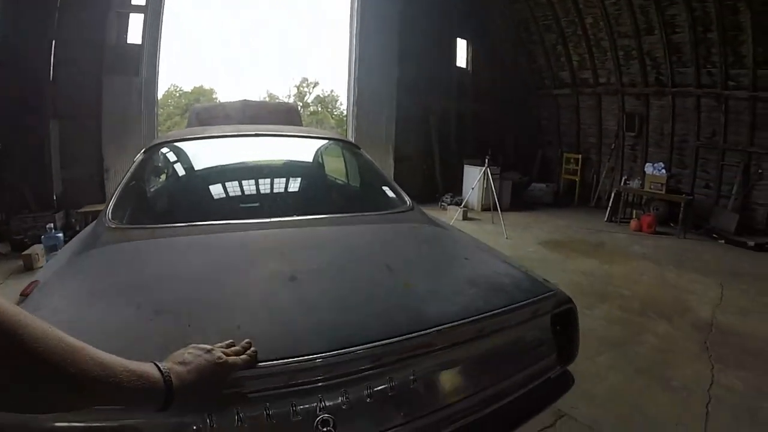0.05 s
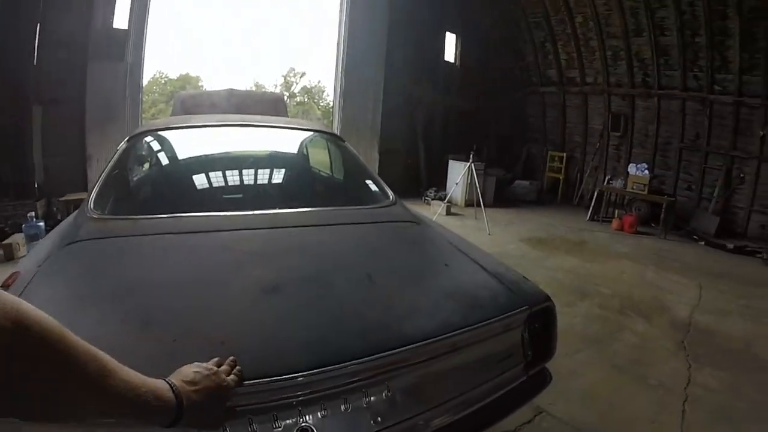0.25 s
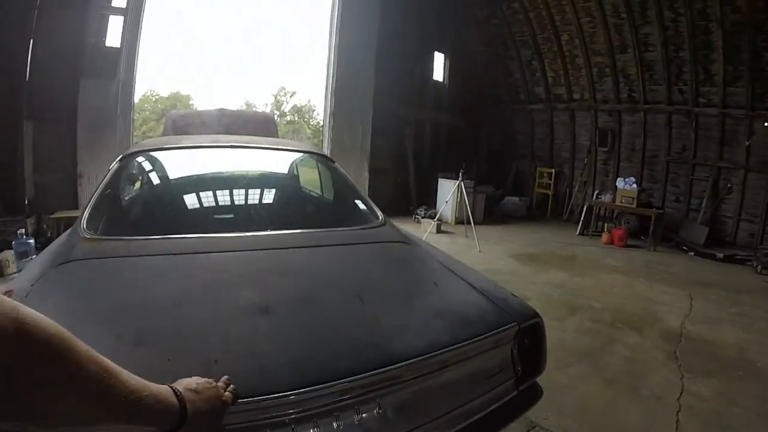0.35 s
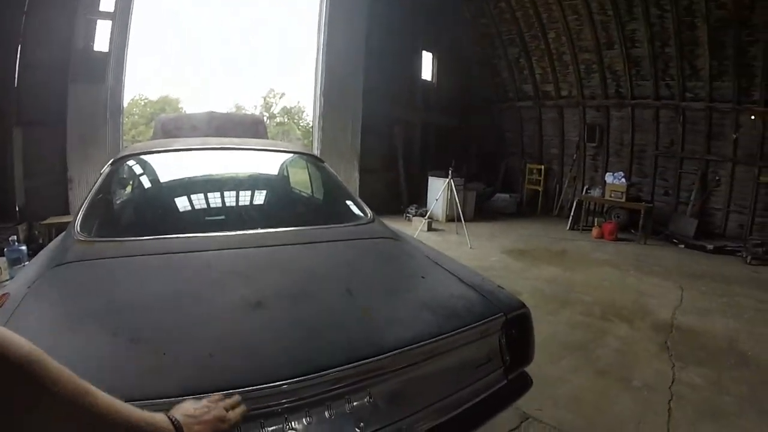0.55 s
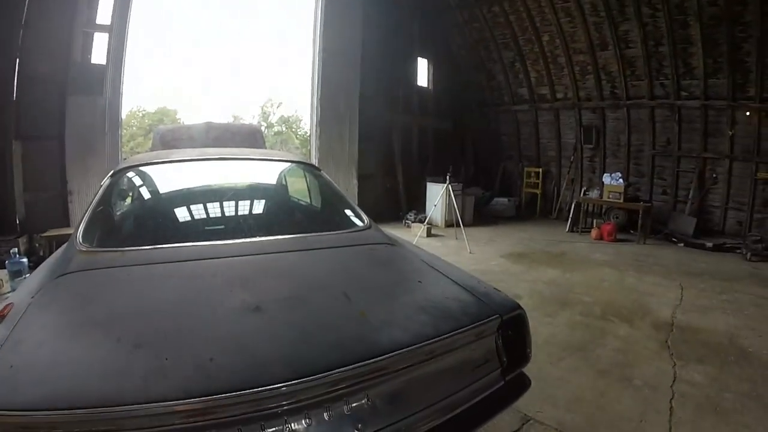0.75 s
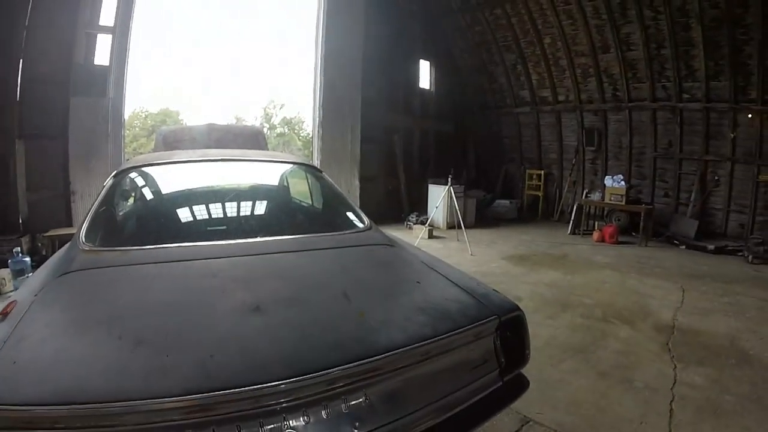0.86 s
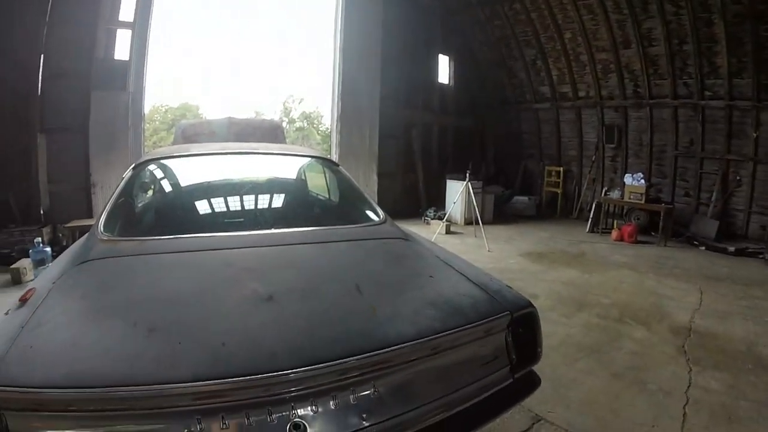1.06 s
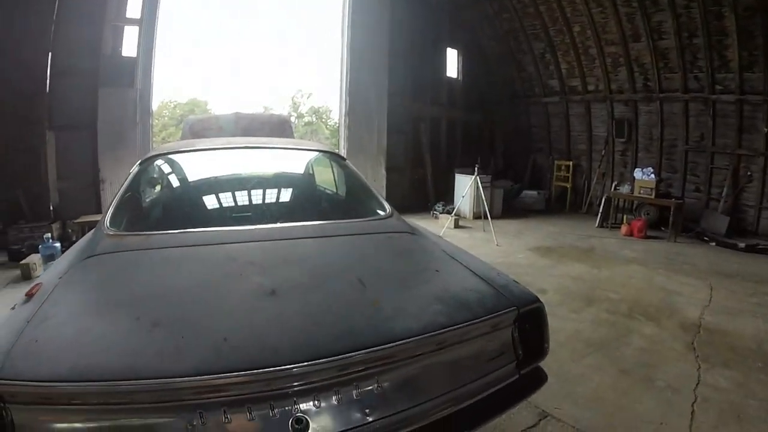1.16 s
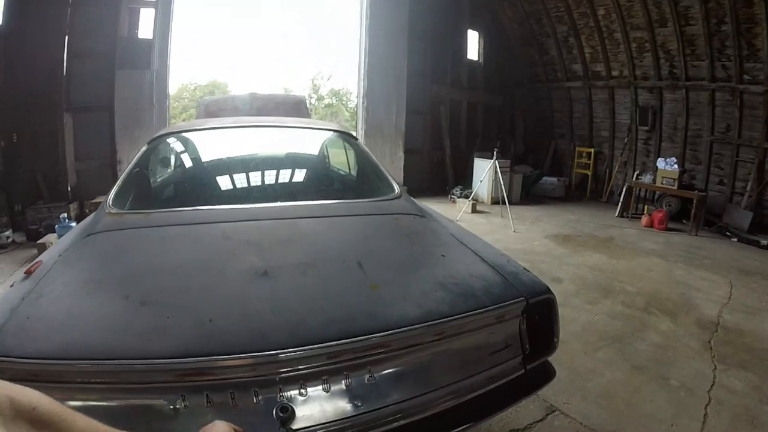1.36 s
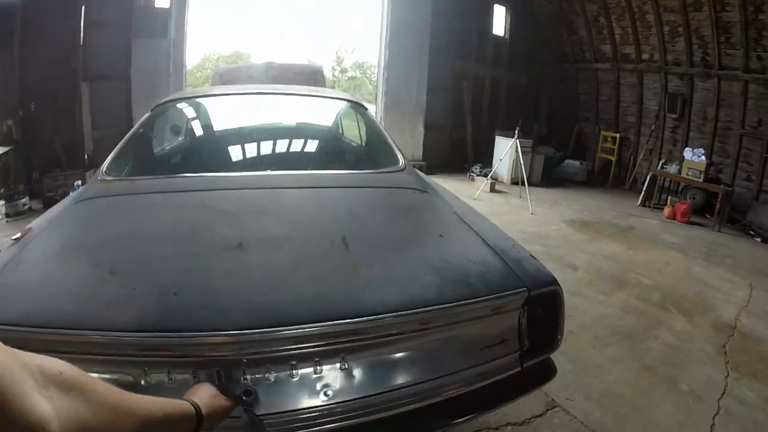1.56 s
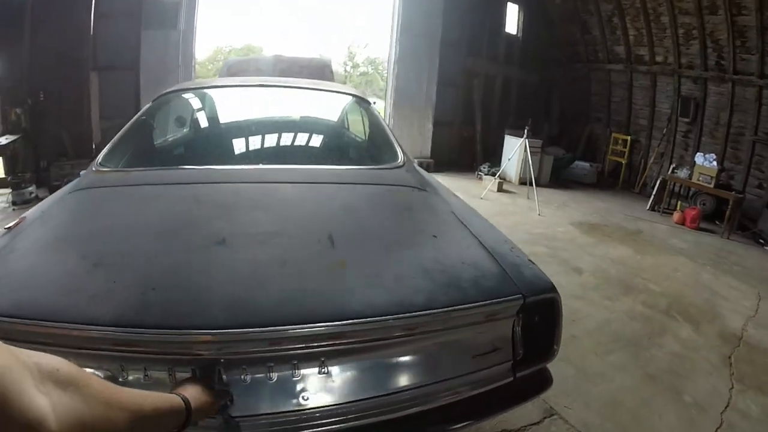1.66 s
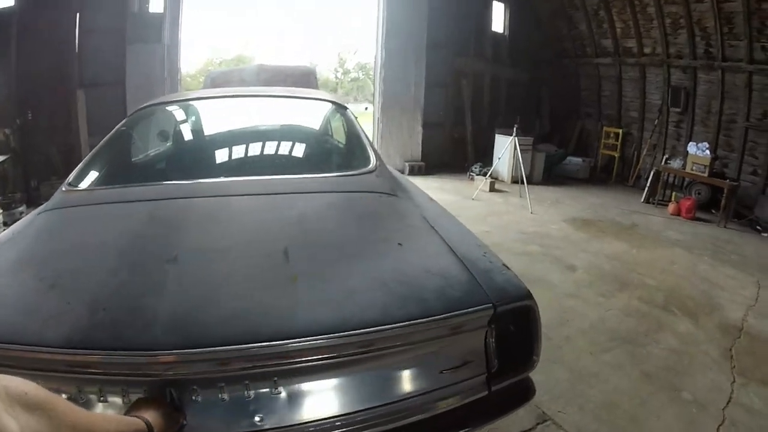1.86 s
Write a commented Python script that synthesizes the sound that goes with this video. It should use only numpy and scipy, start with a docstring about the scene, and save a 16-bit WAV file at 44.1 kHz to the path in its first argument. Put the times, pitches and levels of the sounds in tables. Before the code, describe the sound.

A car trunk lid groans briefly, then slams shut with a ringing thud in a barn.

```python
"""Out of the quiet of a large barn, dry steel hinges rub and groan as an old car's trunk lid is pushed down.
The lid crashes onto latch and frame with a thump of trapped air, rebounds, and lid, body and barn ring.
Light knocks and a squeaking scuff follow, then a hand slides to the lock, works it and ends on a clunk.
Contacts are decaying noise bands, rubbing is gritty noise, the groan is a wavering tone with overtones,
the steel is damped sines, and the barn is a convolved noise tail."""
import sys
import numpy as np
from scipy import signal
from scipy.fft import rfft, irfft
from scipy.io import wavfile

SR = 44100
rng = np.random.default_rng(int(sys.argv[2]) if len(sys.argv) > 2 else 0)


def transcribe(signal):
    """Save signal, clipped to [-1, 1], as a 16-bit WAV file at the path in sys.argv[1]."""
    frames = np.atleast_2d(signal).T
    limited = np.clip(frames, -1, 1)
    pcm = np.round(limited * 32767).astype(np.int16)
    wavfile.write(sys.argv[1], SR, pcm)


N = 83790
T = np.arange(N) / SR
EDGES = np.geomspace(20, 17000, 25)   # band edges, Hz
CENTRES = np.sqrt(EDGES[1:] * EDGES[:-1])


def from_db(db):
    """Decibels to gain."""
    return 10 ** (np.asarray(db) / 20)


def rms_one(x):
    """Scale to rms 1."""
    return x / np.sqrt(np.mean(x ** 2) + 1e-20)


def at_hz(points, hz):
    """Read a table on a log-frequency axis."""
    f, value = np.transpose(points)
    return np.interp(np.log(hz), np.log(f), value)


def level_curve(rows):
    """Gain over time from rows that start with seconds and end with dB; silent outside."""
    rows = np.array(rows)
    level_db = np.interp(T, rows[:, 0], rows[:, -1], left=-200, right=-200)
    return from_db(level_db)


def shaped_noise(gain_at):
    """White noise coloured by a gain function of frequency; rms 1."""
    hz = np.maximum(np.arange(N // 2 + 1) * SR / N, 1)
    white = rfft(rng.standard_normal(N))
    return rms_one(irfft(white * gain_at(hz), N))


def coloured(spectrum):
    """Noise with a tabled spectrum, cut below the lowest band edge."""
    return shaped_noise(lambda hz: from_db(at_hz(spectrum, hz)) * (hz > EDGES[0]))


def narrow_noise(centre_hz, width_hz):
    """Noise in one resonance."""
    return shaped_noise(lambda hz: 1 / (1 + ((hz - centre_hz) / width_hz * 2) ** 2))


def drift(rate_hz):
    """Random wandering of spread 1, mostly slower than the given rate."""
    return shaped_noise(lambda hz: 1 / (1 + (hz / rate_hz) ** 2))


def noise_bands():
    """White noise of rms 1 split into bands that cross-fade into each other."""
    hz = np.arange(N // 2 + 1) * SR / N
    white = rfft(rng.standard_normal(N)) * (hz > EDGES[0])
    place = np.interp(hz, CENTRES, np.arange(len(CENTRES)))
    bands = []
    for k in range(len(CENTRES)):
        share = np.maximum(1 - np.abs(place - k), 0)
        bands.append(irfft(white * share, N))
    return np.array(bands)


def ring(modes, start):
    """Damped sines set off at one moment."""
    age = np.maximum(T - start, 0)
    out = np.zeros(N)
    for hz, db, t60 in modes:
        out += from_db(db - 60 * age / t60) * np.sin(2 * np.pi * hz * age)
    return out


def resonate(x, peaks):
    """Add resonances (f/Hz, width/Hz, gain/dB) to a sound, keeping its overall level."""
    out = x
    for hz, width_hz, db in peaks:
        r = np.exp(-np.pi * width_hz / SR)
        poles = [1, -2 * r * np.cos(2 * np.pi * hz / SR), r * r]
        peak = (1 - r * r) / 2 * signal.lfilter([1, 0, -1], poles, x + 1e-18)
        out = out + from_db(db) * peak
    return rms_one(out) * np.std(x)


RATTLE_DB, RATTLE_HZ = 1.5, 390   # spread and rate of the unevenness in every blow
LOWS_LINGER = 0.21   # ring time falls with frequency by this power


def blows(rows, spectrum):
    """Each blow wakes a dense, rattling crowd of sheet-metal modes; the high ones die first."""
    bands, out = noise_bands(), np.zeros(N)
    for s, db, tilt_db, rise, t60 in rows:
        first = int(s * SR)
        age = T[:min(N - first, SR // 2)]
        gains = from_db(at_hz(spectrum, CENTRES) + tilt_db * np.log2(CENTRES))
        # equal overall power, whatever the colour
        gains /= np.sqrt(np.sum(gains ** 2 * np.diff(EDGES)) / (SR / 2))
        lives = t60 * (CENTRES / 1000) ** -LOWS_LINGER   # the tabled t60 holds at 1 kHz
        dying = from_db(-60 * np.maximum(age - rise, 0) / lives[:, None])
        attack = np.minimum(age / rise, 1)
        span = slice(first, first + len(age))
        out[span] += from_db(db) * attack * (gains @ (bands[:, span] * dying))
    return out * rms_one(from_db(RATTLE_DB * drift(RATTLE_HZ)))


GRIT_DB, GRIT_HZ = 2, 250   # spread and rate of the unevenness in rubbing


def rubbing(curve, spectrum):
    """Friction over grit: unevenly flickering coloured noise under a level curve."""
    gritty = coloured(spectrum) * from_db(GRIT_DB * drift(GRIT_HZ))
    return level_curve(curve) * rms_one(gritty)


# colour of the quiet air: f/Hz, relative level/dB per Hz
AIR_SPECTRUM = [(15, -11), (25, 1), (125, 4.5), (404, -2), (655, -7), (1200, -10.5), (1670, -16),
                (4380, -21), (6040, -25), (15000, -41)]
AIR_DB = -51.5
HISS_HZ, HISS_WIDTH_HZ, HISS_DB = 4935, 390, -65.5   # like far insects


def background():
    """Quiet air in the barn as coloured noise, and a narrow steady hiss from outside."""
    air = from_db(AIR_DB) * coloured(AIR_SPECTRUM)
    hiss = from_db(HISS_DB) * narrow_noise(HISS_HZ, HISS_WIDTH_HZ)
    return air + hiss


# reverberation strength before the build-up: f/Hz, level/dB
BARN_LEVEL = [(30, -10.5), (60, -16), (130, 2.5), (250, -1), (420, -6), (620, -11.5), (2000, -8.5),
              (5000, -12), (9000, -13), (15000, -8)]
# reverberation time: f/Hz, t60/s
BARN_T60 = [(40, 2), (150, 1.25), (350, 1.81), (800, 0.95), (2000, 1.61), (4000, 1.27), (8000, 0.86),
            (15000, 0.53)]
BARN_BUILD_S = 0.028   # time constant of the build-up


def barn(x):
    """Many reflections blur into a diffuse tail that builds up and dies band by band."""
    t60 = at_hz(BARN_T60, CENTRES)[:, None]
    unit_energy = np.sqrt(2 * np.log(1000) / (t60 * SR))
    tails = noise_bands() * from_db(-60 * T / t60) * unit_energy
    build_up = 1 - np.exp(-T / BARN_BUILD_S)
    response = (from_db(at_hz(BARN_LEVEL, CENTRES)) @ tails) * build_up
    return signal.fftconvolve(x, response)[:N]


# light knocks, like a shoe set down on the gritty floor:
# t/s, level/dB, tilt/dB per octave, rise/s, t60/s at 1 kHz
KNOCKS = [(.909, -37, 4, 0.0017, 0.13), (.917, -31.5, 0.5, 0.0003, 0.015), (.927, -39, -9, 0.00062, 0.023),
          (1.088, -44, -0.5, 0.00044, 0.045)]
# their colour before the tilt: f/Hz, relative level/dB per Hz
KNOCK_SPECTRUM = [(100, -1), (550, 7), (1200, 2.5), (2400, 0.5), (4000, -16), (7000, -26.5), (15000, -56)]
# a scuff on the floor: t/s, level/dB
SCUFF = [(1.386, -66), (1.392, -51), (1.41, -52), (1.435, -52.5), (1.448, -46.5), (1.462, -61)]
# its colour: f/Hz, relative level/dB per Hz
SCUFF_SPECTRUM = [(300, -27), (1100, -19), (1600, -2), (2150, -13), (3200, -6), (5000, -20), (9000, -29.5),
                  (15000, -48)]
SQUEAK_S, SQUEAK_HZ, SQUEAK_WIDTH_HZ, SQUEAK_DB, SQUEAK_T60 = 1.39, 2150, 300, -42.5, 0.17


def footwork():
    """Light knocks, then a rubbed scuff that opens with a squeak of decaying narrow noise."""
    age = T - SQUEAK_S
    decay = (age > 0) * from_db(SQUEAK_DB - 60 * np.abs(age) / SQUEAK_T60)
    squeak = decay * narrow_noise(SQUEAK_HZ, SQUEAK_WIDTH_HZ)
    return blows(KNOCKS, KNOCK_SPECTRUM) + rubbing(SCUFF, SCUFF_SPECTRUM) + squeak


# thin metal ticks of spring and lock: t/s, level/dB, tilt/dB per octave, rise/s, t60/s at 1 kHz
TICKS = [(.1935, -40, -1, 0.0013, 0.063), (1.779, -48, 14, 0.0011, 0.07), (1.835, -53, 25, 0.00092, .02)]
# their colour before the tilt: f/Hz, relative level/dB per Hz
TICK_SPECTRUM = [(1000, -30), (3500, 10), (7000, 13), (9000, -5), (15000, -18)]


def ticks():
    """Small, thin metal parts of spring and lock tick as bright, short blows."""
    return blows(TICKS, TICK_SPECTRUM)


# a hand slides over the panel to the lock: t/s, level/dB
HAND = [(1.45, -65.5), (1.73, -55), (1.745, -42), (1.77, -49.5)]
# the hand works the lock: t/s, level/dB, tilt/dB per octave, rise/s, t60/s at 1 kHz
LOCK = [(1.763, -34.5, -0.5, 0.0046, 0.25), (1.782, -31, 2.5, 0.0012, 0.078), (1.797, -45, 2, 0.0034, 0.21),
        (1.843, -45.5, 0, 0.0046, 0.12)]
# colour of the clacks before the tilt: f/Hz, relative level/dB per Hz
LOCK_SPECTRUM = [(100, -32), (320, -3), (560, 3), (1500, -3), (4000, -8), (7000, -17.5), (10000, -46),
                 (15000, -45)]
# resonances of the rear panel around the lock: f/Hz, width/Hz, gain/dB
PANEL_PEAKS = [(595, 94, -2.5), (1457, 73, 5)]
# the lock's button hits its stop: t/s, level/dB, tilt/dB per octave, rise/s, t60/s at 1 kHz
CLUNK = [(1.869, -26.5, 0, 0.00053, 0.1)]
# colour of the clunk before the tilt: f/Hz, relative level/dB per Hz
CLUNK_SPECTRUM = [(280, -21), (520, 7), (1300, 1.5), (2200, -3.5), (3800, -10), (5500, -30), (8500, -30),
                  (12000, -55)]


def lock():
    """The hand's slide and the lock's clacks resonate in the rear panel; a last clunk stays dry."""
    slide = rubbing(HAND, RUB_SPECTRUM)   # coloured like the hinge rubbing
    clacks = blows(LOCK, LOCK_SPECTRUM)
    return resonate(slide + clacks, PANEL_PEAKS) + blows(CLUNK, CLUNK_SPECTRUM)


# ringing of the lid's steel, before STEEL_DB: f/Hz, level/dB, t60/s
LID_MODES = [(118.4, -22.5, 1.5), (242, -16.5, 0.58), (311.6, -15.5, 0.59), (419.2, -15.5, 0.3),
             (484, -9, 0.21), (824, -21.5, 0.16), (945, -14.5, 0.22), (1071, -15, 0.25), (1232, -17.5, 0.4),
             (1796, -32, 0.3), (2400, -31, 0.22)]
# boom of the car body: f/Hz, level/dB, t60/s
BODY_MODES = [(31.74, -23, 0.7), (43.4, -37.5, 3.45), (60.5, -20, 1.1), (78, -28, 0.62)]
STEEL_DB = -4.5   # trim of the lid's ring


def steel():
    """Damped modes: the lid rings from the slam's second contact, the body booms from its third."""
    lid = from_db(STEEL_DB) * ring(LID_MODES, SLAM[1][0])
    body = ring(BODY_MODES, SLAM[2][0])
    return lid + body


# hinge groan: t/s, pitch f/Hz before the waver, level/dB before the breaks
GROAN = [(0.0, 400.8, -54.5), (.1, 409.6, -54), (.165, 410.8, -41.5), (.185, 411, -33.5),
         (.206, 427, -20.5), (.216, 436, -40), (.228, 452.6, -19), (.238, 468.6, -23.5), (.25, 476, -28),
         (.29, 475, -68)]
# the groan's harmonics from the fundamental up: relative level/dB
GROAN_OVERTONES_DB = [4, -16, -29]
GROAN_WAVER, GROAN_WAVER_HZ = 0.028, 65   # spread as a share of the pitch; rate
# the groan catches and breaks until the lid is up to speed
GROAN_BREAKS_DB, GROAN_BREAKS_HZ, GROAN_STEADY_S = 3.5, 45, 0.17
# dry rubbing of the hinges: t/s, level/dB before the resonances and dulling
RUB = [(.062, -38), (.07, -41), (.085, -42), (.125, -37.5), (.15, -36), (.175, -37.5), (.215, -33),
       (.25, -35.5), (.27, -61)]
# its colour: f/Hz, relative level/dB per Hz
RUB_SPECTRUM = [(150, -17), (400, 5), (700, -3.5), (1300, -1), (2500, -10.5), (5000, -20), (8000, -35),
                (15000, -60)]
# resonances of the hinge springs: f/Hz, width/Hz, gain/dB
SPRING_PEAKS = [(676, 100, 7), (2510, 38, 5), (3125, 38, 13)]
RUB_RING_DB, RUB_RING_WIDTH_HZ = 7.5, 5.1   # the rubbing wakes the lid's modes
RUB_DULLS_S, RUB_FADE_S, RUB_DULL_HZ = 0.17, 0.063, 1170   # treble goes as the lid swings free


def hinges():
    """A stick-slip groan steadies and rises as the lid gathers speed, over dry rubbing."""
    s, hz, _ = np.transpose(GROAN)
    pitch = np.interp(T, s, hz) * (1 + GROAN_WAVER * drift(GROAN_WAVER_HZ))
    phase = 2 * np.pi * np.cumsum(pitch) / SR
    tone = np.zeros(N)
    for k, db in enumerate(GROAN_OVERTONES_DB):
        tone += from_db(db) * np.sin((k + 1) * phase)
    unsteady = np.clip(1 - (T / GROAN_STEADY_S) ** 2, 0, 1)
    breaks = from_db(GROAN_BREAKS_DB * drift(GROAN_BREAKS_HZ) * unsteady)
    groan = rms_one(tone) * breaks * level_curve(GROAN)

    lid_peaks = [(mode[0], RUB_RING_WIDTH_HZ, RUB_RING_DB) for mode in LID_MODES]
    rub = resonate(rubbing(RUB, RUB_SPECTRUM), SPRING_PEAKS + lid_peaks)
    dull = signal.sosfilt(signal.butter(2, RUB_DULL_HZ, fs=SR, output="sos"), rub)
    free = np.clip((T - RUB_DULLS_S) / RUB_FADE_S, 0, 1)
    return groan + rub * (1 - free) + dull * free


# the lid strikes latch and frame: t/s, level/dB, tilt/dB per octave, rise/s, t60/s at 1 kHz
SLAM = [(0.2517, -11.5, -0.5, 0.0021, 0.17), (.262, -13.5, -4, 0.0012, 0.079),
        (0.2693, -20, 5, 0.0011, 0.2), (0.2914, -18, -4.5, 0.0035, 0.33)]
# colour of the crash before the tilt: f/Hz, relative level/dB per Hz
LID_SPECTRUM = [(70, -9), (150, -8.5), (280, -6.5), (480, 4), (760, -4.5), (1120, 1), (2000, -7.5),
                (3200, -12.5), (6500, -19.5), (9000, -27), (15000, -42.5)]
# the lid springs back and rattles in the latch:
# t/s, level/dB, tilt/dB per octave, rise/s, t60/s at 1 kHz
REBOUND = [(.3155, -32, 3.5, 0.0012, 0.55), (.3455, -25.5, 0, 0.0012, 0.047),
           (.3505, -19, 4, 0.0005, 0.068)]
# colour of the rebound before the tilt: f/Hz, relative level/dB per Hz
REBOUND_SPECTRUM = [(200, 6), (850, -1), (1300, 0.5), (1900, -8.5), (3800, -12), (7000, -27), (8500, -35),
                    (15000, -64)]
# air squeezed out of the trunk; the time is the middle of the thump, the level its peak
THUMP_S, THUMP_HZ, THUMP_WIDTH_S, THUMP_DB = .275, 47, 0.013, -7


def slam():
    """Steel contacts crash, trapped air thumps as a short low pulse, and the lid rebounds."""
    lag = T - THUMP_S
    swell = np.exp(-(lag / THUMP_WIDTH_S) ** 2)
    thump = from_db(THUMP_DB) * swell * np.cos(2 * np.pi * THUMP_HZ * lag)
    return blows(SLAM, LID_SPECTRUM) + thump + blows(REBOUND, REBOUND_SPECTRUM)


STEEL_IN_BARN_DB = -8   # share of the lid and body ringing that fills the barn


def scene():
    """All sources and their reverberation, in mono."""
    near = footwork() + ticks() + lock() + hinges() + slam()
    ringing = steel()
    reverberation = barn(near + from_db(STEEL_IN_BARN_DB) * ringing)
    return (background() + reverberation + ringing + near)[None]


CUTOFF_HZ = 15300


def record(dry):
    """The loudest peaks are rounded towards 0.95 and the top is cut steeply."""
    rounded = dry / (1 + (dry / .95) ** 6) ** (1 / 6)
    top_cut = signal.ellip(10, .1, 80, CUTOFF_HZ, fs=SR, output="sos")
    return signal.sosfilt(top_cut, rounded)


dry = scene()
out = record(dry)
transcribe(out)
```